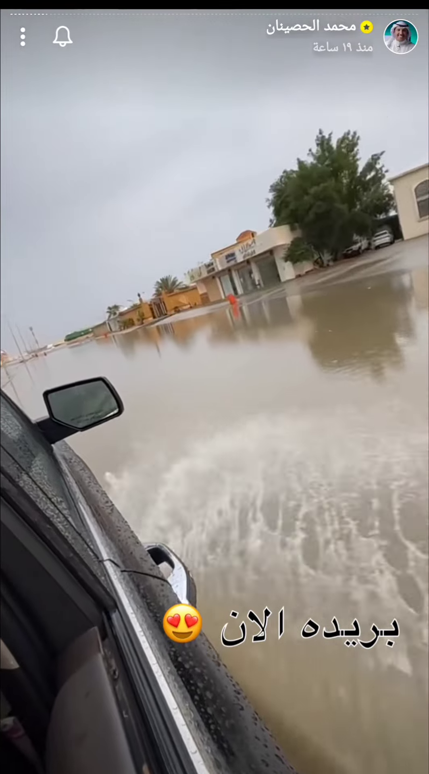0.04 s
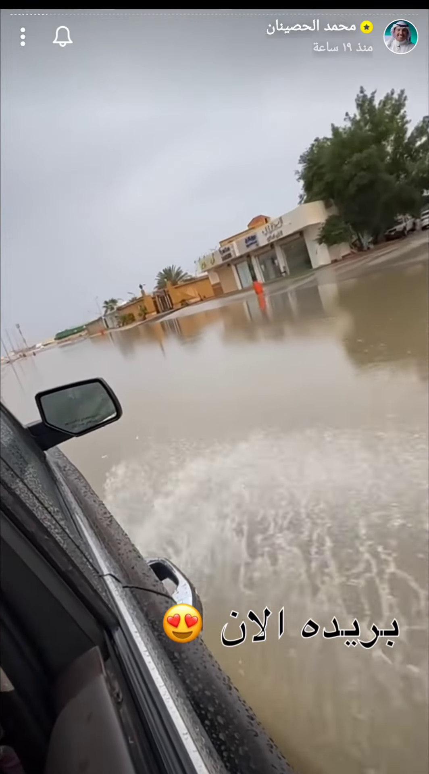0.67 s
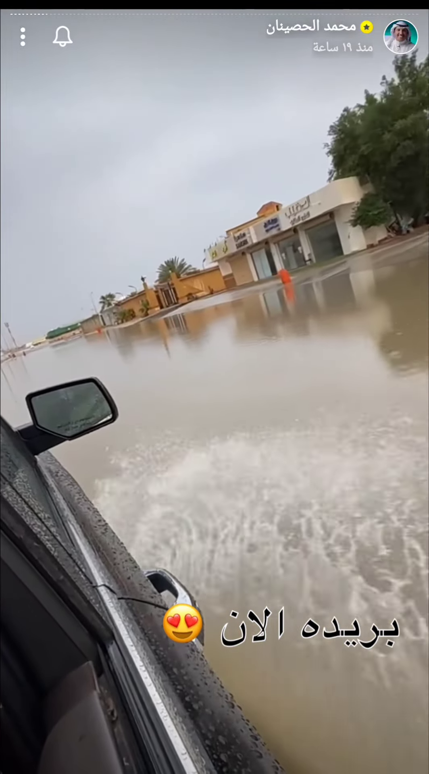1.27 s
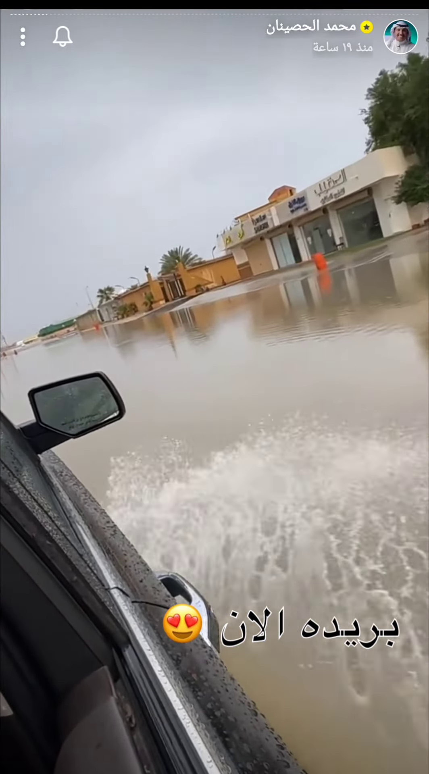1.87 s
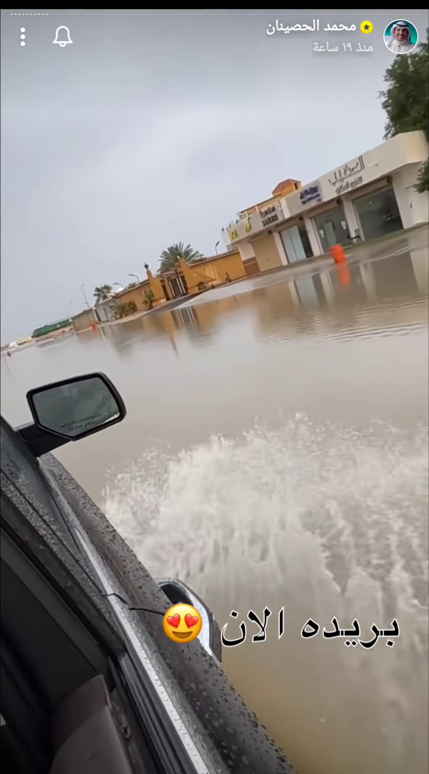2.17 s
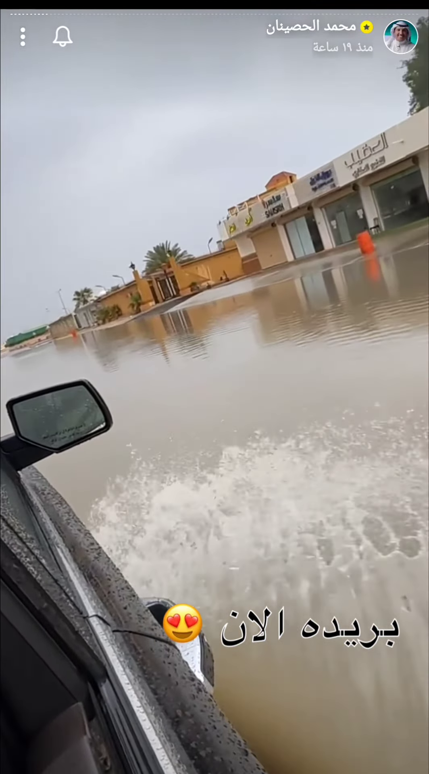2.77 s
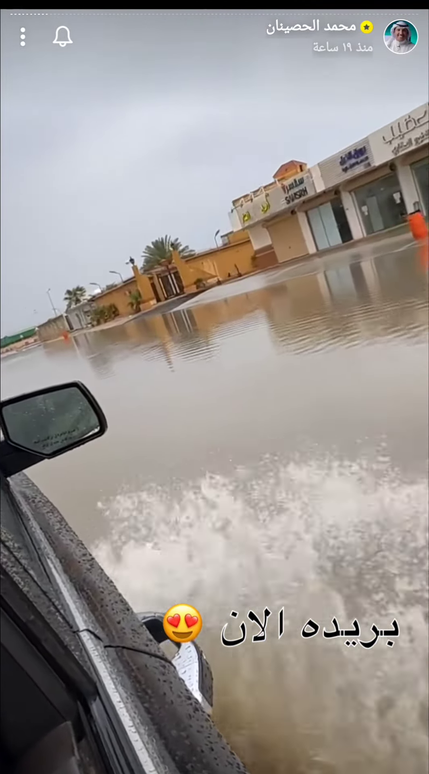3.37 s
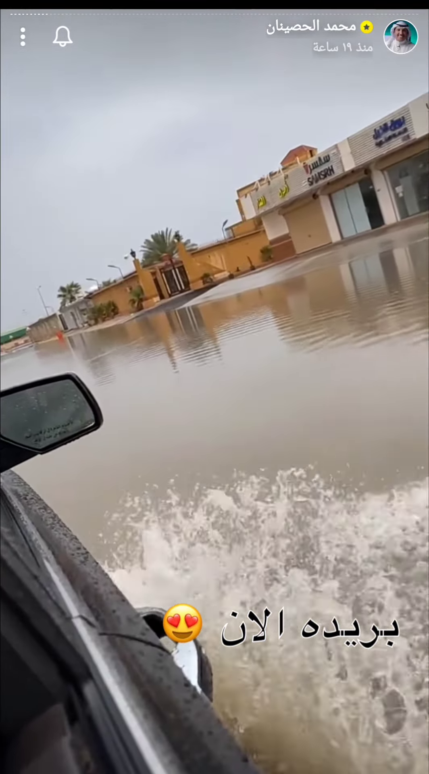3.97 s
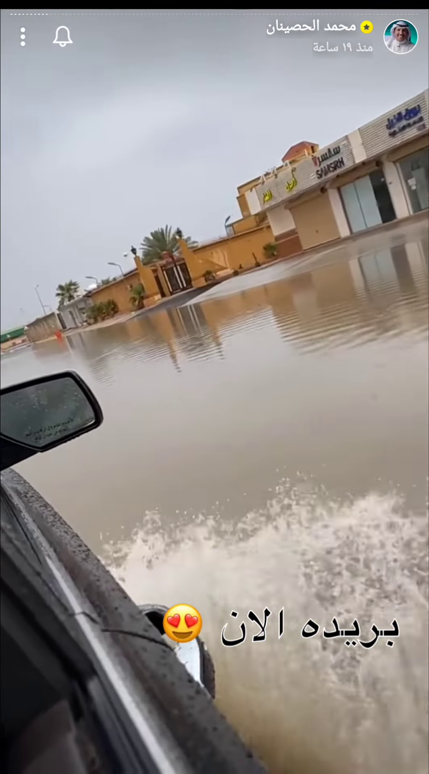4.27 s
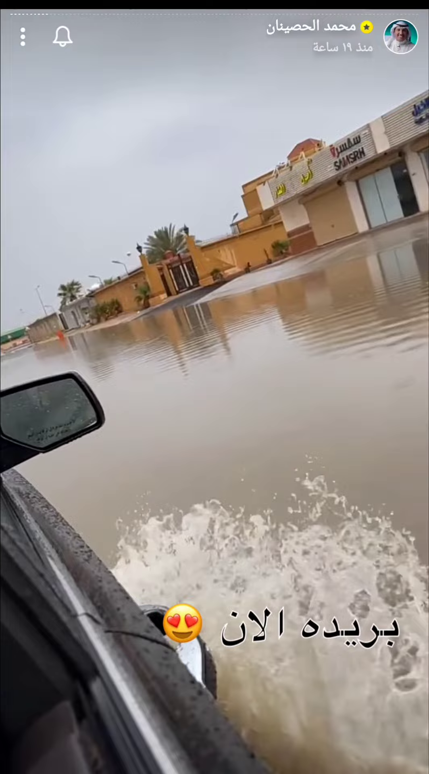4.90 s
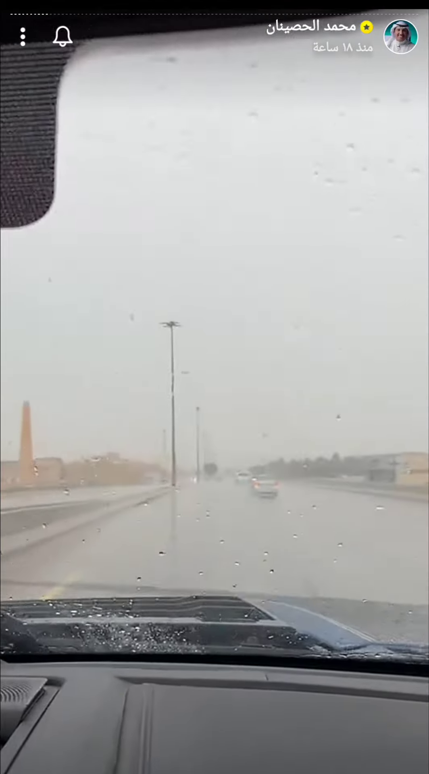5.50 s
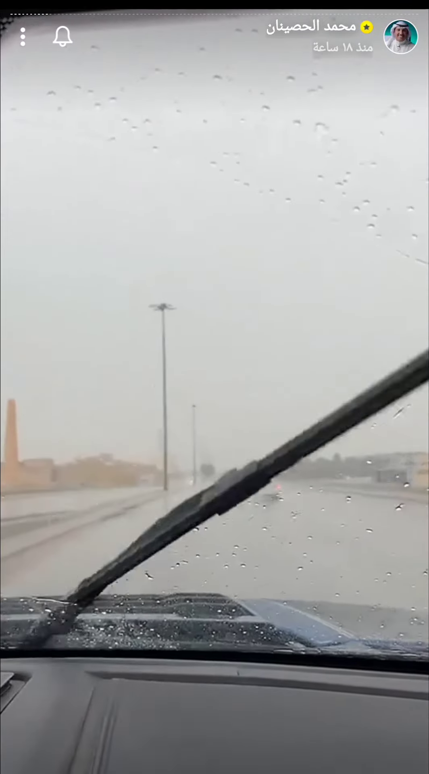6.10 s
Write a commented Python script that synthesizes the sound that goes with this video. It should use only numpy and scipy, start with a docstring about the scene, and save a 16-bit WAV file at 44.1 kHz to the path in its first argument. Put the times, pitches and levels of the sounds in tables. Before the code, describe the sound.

A car ploughs through floodwater with hissing spray and wind buffeting, then engine drone, tyre rumble and heavy rain inside the cabin.

```python
"""Flooded street, at a car's open side window: the wheel churns the water and throws a hissing sheet
of spray while gusts buffet the microphone. After a short silence, the closed cabin on a wet highway:
engine drone, tyre rumble, heavy rain on the windscreen. Water is ringing bubbles, clicks and noise;
wind and tyres are shaped noise; the engine is a sum of firing orders. One microphone, mono."""
import sys
import numpy as np
from scipy import signal
from scipy.fft import rfft, irfft, next_fast_len
from scipy.io import wavfile
from scipy.ndimage import uniform_filter1d

SR = 44100
rng = np.random.default_rng(int(sys.argv[2]) if len(sys.argv) > 2 else 0)


def dump(signal):
    """Clip the signal to [-1, 1] and save it as 16-bit WAV at the path in sys.argv[1]."""
    limited = np.clip(np.atleast_2d(signal).T, -1, 1)
    pcm = np.round(limited * 32767).astype(np.int16)
    wavfile.write(sys.argv[1], SR, pcm)


N = 275625
TIME_S = np.arange(N) / SR
WINDOW_SPAN_S, CABIN_SPAN_S = (0, 4.447), (5.011, 6.3)

# Engine drone (time [s], level [dB])
ENGINE_LEVEL = [(5.0, -23), (5.6, -20), (5.8, -30.5)]
# Engine orders (multiple of firing rate, relative level [dB])
ENGINE_ORDERS = [(1, 2.5), (2, -5), (2.5, -10), (4, -28)]
# Tyre rumble (time [s], relative level [dB])
TYRE_LEVEL = [(5.02, -19.5), (5.13, -24), (5.38, -17), (5.54, -21.5), (5.605, -13.5), (5.69, -24),
              (5.82, -26), (5.9, -17), (6.25, -21)]
# Rain wash (time [s], level [dB])
RAIN_LEVEL = [(5.0, -33.5), (5.72, -33), (6.14, -35), (6.2, -31)]
# Fat drops on the windscreen (time [s], relative peak [dB])
FAT_DROPS = [(5.409, -17), (5.782, -30), (5.857, -28), (5.8989, -18.5), (5.979, -21), (6.0944, -35),
             (6.1318, -24), (6.1653, -19)]
# Cabin spectra: tyre rumble, road roar, struck glass (frequency [Hz], relative density [dB])
TYRE_SPECTRUM = [(12, -41), (20, -18), (48, 3), (70, 0.5), (130, -8.5), (159, -13.5), (183, -23),
                 (200, -23), (260, -52), (440, -120)]
ROAR_SPECTRUM = [(100, -24), (170, -0.5), (188, -2.5), (367, -4), (411, -7.5), (505, -6), (656, -9.5),
                 (734, -8.5), (807, -15), (1020, -12), (1600, -21), (2080, -46), (3520, -120)]
GLASS_SPECTRUM = [(600, -12), (1400, 2), (2500, -.5), (4400, -1.5), (4900, -9.5), (5450, -.5), (6600, 1),
                  (8300, -.5), (10400, -7.5), (12500, -14), (15500, -12)]

# Airflow past the window (time [s], relative level [dB])
AIRFLOW_LEVEL = [(0, -15), (0.37, -17), (0.49, -22.5), (0.72, -16), (0.96, -25), (1.12, -22.5),
                 (1.35, -25.5), (1.8, -26.5), (2.13, -22), (2.3, -26.5), (2.5, -20.5), (2.88, -21),
                 (3.42, -17.5), (3.9, -25.5), (4.42, -26.5)]
# Gusts on the microphone (crest time [s], relative thump [dB], relative slap [dB])
GUSTS = [(0.055, -13, -21), (0.135, -16.5, -24), (0.28, -14.5, -21), (0.365, -15, -25.5),
         (0.58, -14.5, -18), (0.69, -10, -20.5), (1.035, -16, -25), (1.17, -15, -28), (2.06, -17, -28),
         (2.18, -16, -18.5), (2.57, -12.5, -30), (2.71, -10.5, -34), (3.015, -10.5, -15.5),
         (3.28, -10, -24), (3.385, -11, -20), (3.455, -13.5, -18), (3.54, -14.5, -19), (3.65, -14, -33),
         (3.8, -13.5, -42), (4.37, -19, -38)]
# Wind spectra: deep buffeting, fine eddies (frequency [Hz], relative density [dB])
BUFFET_SPECTRUM = [(12, -34), (20, -27.5), (45, -5), (65, 0.5), (86, -1), (200, -13.5), (260, -38),
                   (440, -120)]
EDDY_SPECTRUM = [(120, -14.5), (200, 0), (280, -1), (420, -8), (600, -12), (1000, -23.5), (2000, -37.5)]

# Reflections off door, mirror and window frame (delay [s], gain [dB])
DOOR_ECHOES = [(.0023, -29), (.0052, -20), (.0087, -18)]
# Lone splashes on the door (time [s], relative peak [dB])
DOOR_SPLASHES = [(0.9525, -3), (1.0856, -1), (1.1493, -20), (1.2645, -5), (2.0193, -15.5)]
# Water sheet off the wheel (time [s], hiss centre [Hz], relative hiss [dB], slosh [dB])
WATER_SHEET = [(0, 4870, -26, -41), (1.0, 4890, -38, -45.5), (2.0, 4570, -37, -40), (3.0, 4144, -29, -40.5),
               (3.6, 3940, -26.5, -34.5), (4.42, 3893, -30.5, -33)]
# Bow wave (time [s], relative churn [dB], relative spray [dB])
BOW_WAVE_LEVELS = [(0, -28.5, -24.0), (0.35, -29.0, -23), (0.55, -29, -24.5), (1.3, -29.5, -23.5),
                   (1.95, -29.5, -23.5), (2.65, -28.0, -20.5), (3.1, -27.5, -20.5), (3.7, -27, -21),
                   (4.0, -29, -24.0), (4.42, -31, -26)]
# Water spectra: tumbling slosh, wheel churn, falling spray (frequency [Hz], relative density [dB])
SLOSH_SPECTRUM = [(250, -25), (480, -6.5), (650, 1.5), (900, -0.5), (1150, 3.5), (1500, 1), (2300, -28.5)]
CHURN_SPECTRUM = [(260, -27.5), (450, -21), (524, -6), (653, 2), (735, -6), (807, -3.5), (908, -10.5),
                  (1070, -3), (1370, -5.5), (1600, 3), (1800, -2), (2100, 2), (2550, -6.5), (2780, -1),
                  (3400, -7.5), (4420, -42.5), (7480, -120)]
SPRAY_SPECTRUM = [(2000, -34.5), (3350, -11.5), (3750, -3), (4800, -1), (5750, -5), (6400, -3),
                  (7300, -5.5), (8600, -14.5), (10600, -19.5), (11800, -18), (12300, -13), (13500, -14.5),
                  (15700, -17)]


def from_db(db):
    """Decibels to gain."""
    return 10 ** (np.asarray(db) / 20)


def unit_rms(x):
    """Scale to unit power."""
    return x / np.sqrt(np.mean(x ** 2) + 1e-20)


def curves(table):
    """Columns of a time table, interpolated per sample."""
    times_s, *columns = np.transpose(table)
    return [np.interp(TIME_S, times_s, column) for column in columns]


def gate(start_s, end_s):
    """On between two times, abrupt edges."""
    return uniform_filter1d(((TIME_S >= start_s) & (TIME_S < end_s)) * 1., size=64)


def low_pass(x, cutoff_hz):
    """Steep treble cut."""
    return signal.sosfilt(signal.ellip(12, .1, 90, cutoff_hz, fs=SR, output="sos"), x + 1e-18)


def coloured(x, spectrum):
    """Minimum-phase filter with the given spectrum."""
    size = 2 * next_fast_len(N // 2 + SR // 10)
    hz, db = np.transpose(spectrum)
    grid_hz = np.maximum(np.arange(size // 2 + 1) * SR / size, 1)
    gain = from_db(np.interp(np.log(grid_hz), np.log(hz), db))
    cepstrum = irfft(np.log(gain))
    cepstrum[1:size // 2] *= 2
    cepstrum[size // 2 + 1:] = 0
    return irfft(rfft(x, size) * np.exp(rfft(cepstrum)))[:N]


def drift(corner_hz):
    """Slow random wander, unit RMS: noise through two one-pole low-passes."""
    hop, warm_up = 40, 2000
    pole = np.exp(-2 * np.pi * corner_hz * hop / SR)
    noise = rng.standard_normal(N // hop + warm_up + 2)
    slow = signal.lfilter([1], [1, -2 * pole, pole * pole], noise)[warm_up:]
    return np.interp(np.arange(N) / hop, np.arange(len(slow)), unit_rms(slow))


def swells(crests_s, levels_db, half_length_s):
    """Bell-shaped gain around each crest."""
    return sum(from_db(db) * np.exp(-((TIME_S - crest_s) / half_length_s) ** 2)
               for crest_s, db in zip(crests_s, levels_db))


def turbulence(spectrum, steady_s):
    """Shaped noise, power steady over spans beyond steady_s."""
    noise = unit_rms(coloured(rng.standard_normal(N), spectrum))
    power = uniform_filter1d(noise ** 2, int(steady_s * SR))
    return noise / np.sqrt(power + 1e-6)


def impacts(per_s, spread_db):
    """Random clicks, mostly small, a few large."""
    sizes = from_db(spread_db * np.minimum(rng.exponential(1, N), 5))
    return unit_rms(sizes * rng.choice([-1, 1], N) * (rng.random(N) < per_s / SR))


def bubbles(per_s, low_hz, high_hz, ring_cycles, spread_db, size_count=40):
    """Randomly born bubbles: size sets pitch; each fades 60 dB in ring_cycles."""
    births = impacts(per_s, spread_db)
    size_index = rng.integers(0, size_count, N)
    ringing = np.zeros(N)
    for k, hz in enumerate(np.geomspace(low_hz, high_hz, size_count)):
        radius = np.exp(-np.log(1000) * hz / (ring_cycles * SR))
        resonator = [1, -2 * radius * np.cos(2 * np.pi * hz / SR), radius * radius]
        ringing += np.sqrt(hz) * signal.lfilter([1, 0, -1], resonator, births * (size_index == k) + 1e-18)
    return unit_rms(ringing)


def spatter(drops, spectrum, decay_s):
    """Bursting drops: a few milliseconds of decaying noise each."""
    decay = np.exp(-TIME_S[:SR // 20] / decay_s)
    hits = np.zeros(N)
    for time_s, db in drops:
        start = round(time_s * SR)
        hits[start:start + len(decay)] += from_db(db) * rng.standard_normal(len(decay)) * decay
    return coloured(hits, spectrum)


def engine(firing_hz=59.7):
    """Firing orders drone through the body at cruise, wavering slightly."""
    level_db, = curves(ENGINE_LEVEL)
    phase = 2 * np.pi * np.cumsum(firing_hz * (1 + 0.014 * drift(6.5))) / SR
    drone = sum(from_db(db + 1.9 * drift(4.3)) * np.sin(order * phase + rng.uniform(0, 2 * np.pi))
                for order, db in ENGINE_ORDERS)
    return unit_rms(drone) * from_db(level_db)


def tyres():
    """Tyres boom and roar through the floor."""
    level_db, = curves(TYRE_LEVEL)
    boom = turbulence(TYRE_SPECTRUM, steady_s=0.082) * from_db(level_db - 0.4 + 1.5 * drift(17))
    roar = turbulence(ROAR_SPECTRUM, steady_s=0.13) * from_db(-30 + 1.04 * drift(43))
    return boom + roar


def rain(flurry_db=1.4):
    """Rain ticks on the glass over a wash of fine drops, in flurries; a few fat drops burst."""
    level_db, = curves(RAIN_LEVEL)
    patter = impacts(per_s=820, spread_db=4) + from_db(6) * rng.standard_normal(N)
    wash = unit_rms(coloured(patter, GLASS_SPECTRUM)) * from_db(level_db + flurry_db * drift(24))
    return wash + from_db(-4) * spatter(FAT_DROPS, GLASS_SPECTRUM, decay_s=0.0067)


def wind(gust_trim_db=-1.5):
    """Airflow buffets the microphone and breaks into flutter; each gust adds a thump and a slap."""
    air_db, = curves(AIRFLOW_LEVEL)
    crests_s, thump_db, slap_db = np.transpose(GUSTS)
    lumps = drift(25)
    buffet_gain = from_db(air_db - 0.5 + 2 * lumps)
    flutter_gain = from_db(air_db - air_db.mean() - 32 + 2.78 * lumps)
    thump_gain = swells(crests_s, thump_db + gust_trim_db, half_length_s=0.023)
    slap_gain = swells(crests_s, slap_db + gust_trim_db, half_length_s=0.015)
    buffet = turbulence(BUFFET_SPECTRUM, steady_s=0.05) * np.hypot(buffet_gain, thump_gain)
    flutter = turbulence(EDDY_SPECTRUM, steady_s=0.039) * np.hypot(flutter_gain, slap_gain)
    return buffet + flutter


def door_reflections(x):
    """Close echoes ripple the spectrum; the hiss turns slightly hollow."""
    return x + sum(from_db(db) * np.pad(x, (round(delay_s * SR), 0))[:N] for delay_s, db in DOOR_ECHOES)


def door_splashes():
    """Lone splashes burst against the door."""
    return from_db(-5) * spatter(DOOR_SPLASHES, SPRAY_SPECTRUM, decay_s=0.0037)


def water_sheet(half_width_hz=230):
    """The sheet thickens and its drops grow: the hiss sinks in pitch, a deep slosh swells."""
    centre_hz, hiss_db, slosh_db = curves(WATER_SHEET)
    phase = 2 * np.pi * np.cumsum(centre_hz) / SR
    baseband = signal.butter(2, half_width_hz, fs=SR, output="sos")
    in_phase, quadrature = signal.sosfilt(baseband, rng.standard_normal((2, N)))
    hiss = unit_rms(in_phase * np.cos(phase) + quadrature * np.sin(phase))
    glugs = bubbles(per_s=350, low_hz=436, high_hz=1617, ring_cycles=17, spread_db=1.5)
    slosh = unit_rms(coloured(glugs + from_db(7) * rng.standard_normal(N), SLOSH_SPECTRUM))
    return hiss * from_db(hiss_db - 5) + slosh * from_db(slosh_db)


def bow_wave():
    """The wheel churns up bubbles; spray falls back in clumps of fizzing droplets."""
    churn_db, spray_db = curves(BOW_WAVE_LEVELS)
    clumps = drift(15)
    gurgle = from_db(-9.5) * bubbles(per_s=500, low_hz=697, high_hz=3652, ring_cycles=45, spread_db=1.5)
    plops = from_db(0.5) * impacts(per_s=900, spread_db=0)
    churn = unit_rms(coloured(gurgle + plops + rng.standard_normal(N), CHURN_SPECTRUM))
    fizz = from_db(-6) * bubbles(per_s=900, low_hz=3010, high_hz=14040, ring_cycles=130, spread_db=2.5)
    splats = impacts(per_s=2600 * from_db(2.3 * clumps), spread_db=2)
    spray = unit_rms(coloured(fizz + splats + from_db(3.5) * rng.standard_normal(N), SPRAY_SPECTRUM))
    churn_gain = from_db(churn_db - 0.36 + 0.5 * drift(27))
    spray_gain = from_db(spray_db - 0.3 + 0.5 * clumps)
    return churn * churn_gain + spray * spray_gain


def scene(muffled_hz=8700, brightens_s=5.335):
    """Open window, silence, then the cabin, slightly muffled at first."""
    water = door_reflections(bow_wave() + door_splashes() + water_sheet())
    tail_gain = from_db(-14.5 - 1000 * np.abs(TIME_S - WINDOW_SPAN_S[1]))
    outside = (water + wind()) * np.maximum(gate(*WINDOW_SPAN_S), tail_gain)
    cabin = (engine() + tyres() + rain()) * gate(*CABIN_SPAN_S)
    bright = gate(brightens_s, CABIN_SPAN_S[1])
    inside = bright * cabin + (1 - bright) * low_pass(cabin, muffled_hz)
    return np.tile(outside + inside, (2, 1))


def record(dry):
    """Soft peak limit, then a top cut."""
    rounded = dry / (1 + (dry / 0.8) ** 6) ** (1 / 6)
    return low_pass(rounded, cutoff_hz=15750)


dry = scene()
out = record(dry)
dump(out)
```